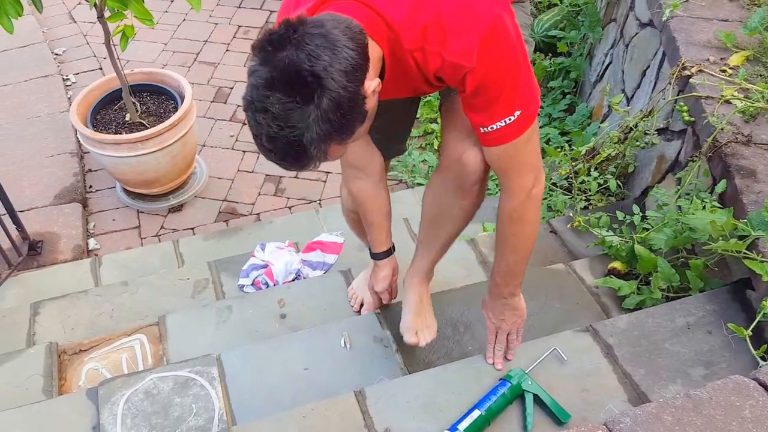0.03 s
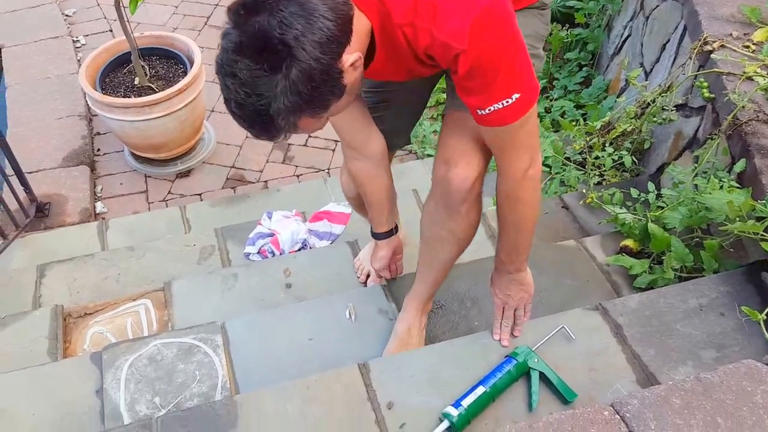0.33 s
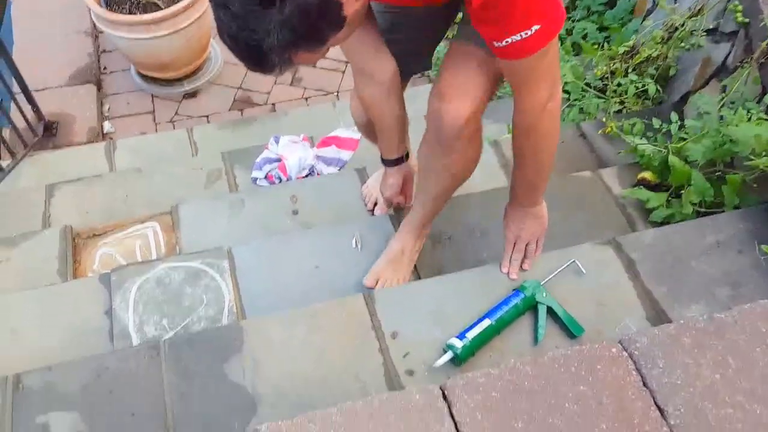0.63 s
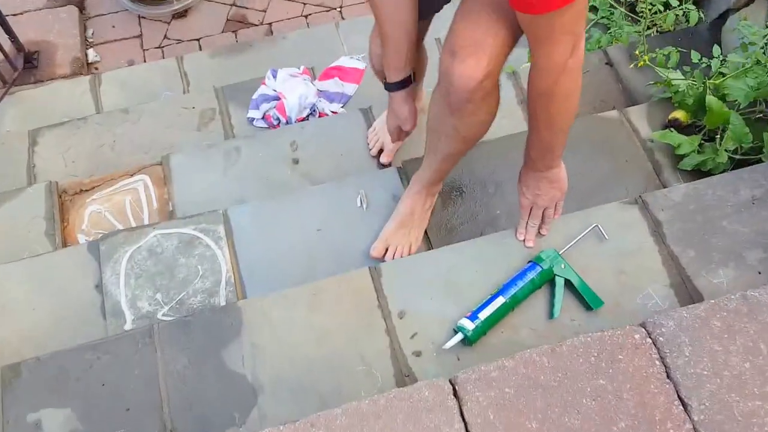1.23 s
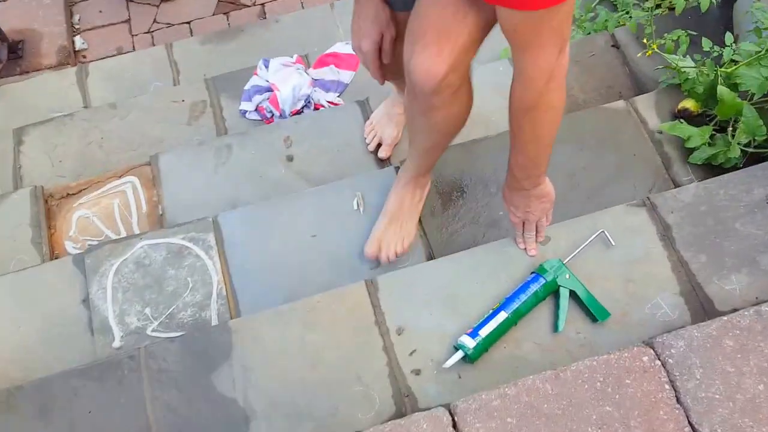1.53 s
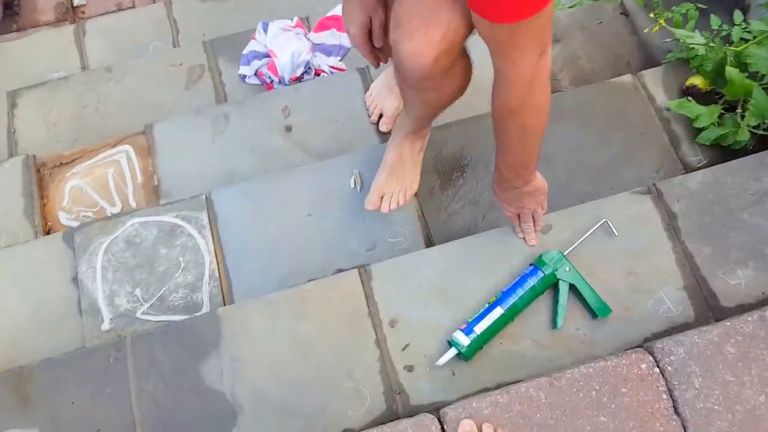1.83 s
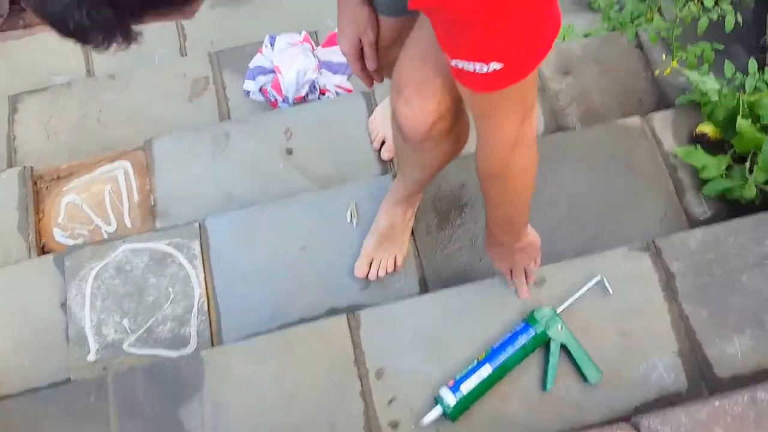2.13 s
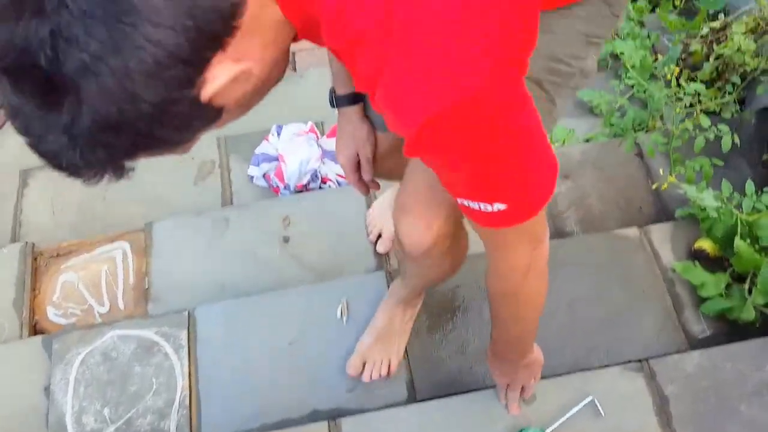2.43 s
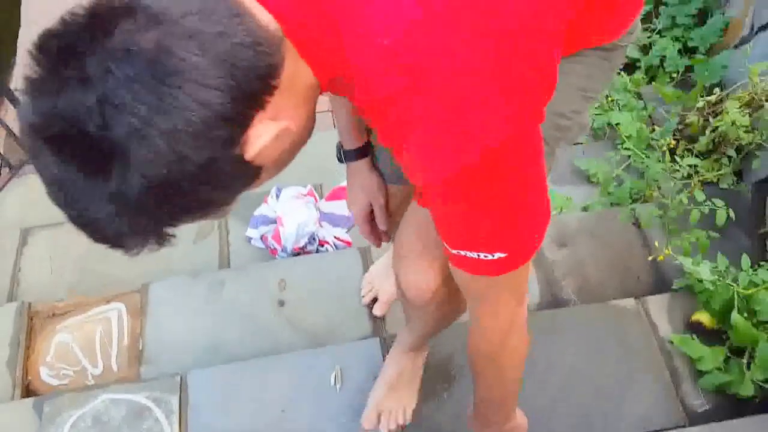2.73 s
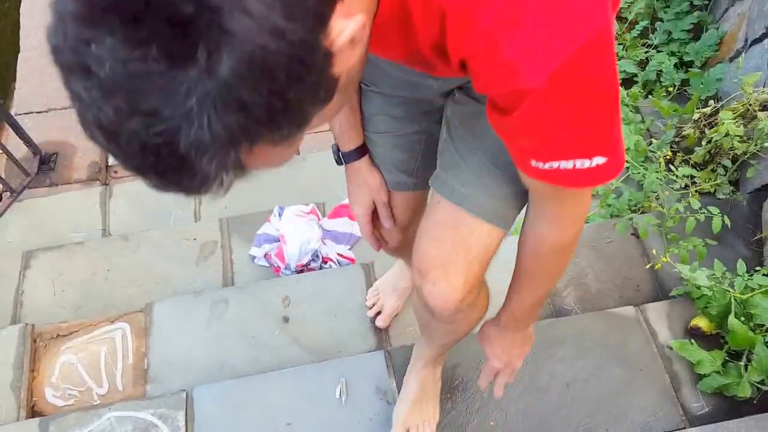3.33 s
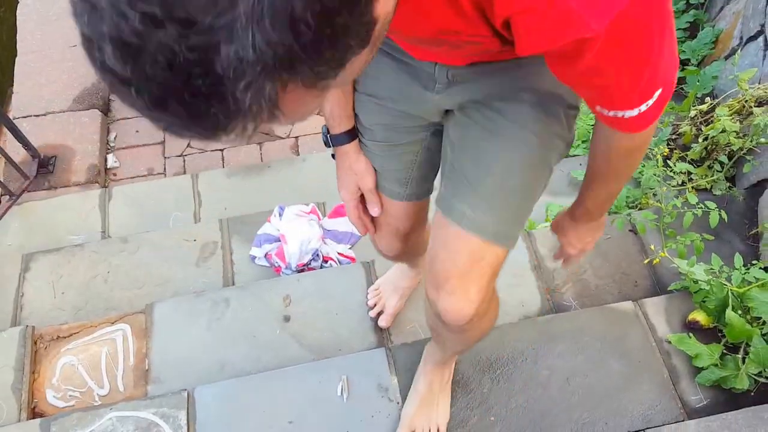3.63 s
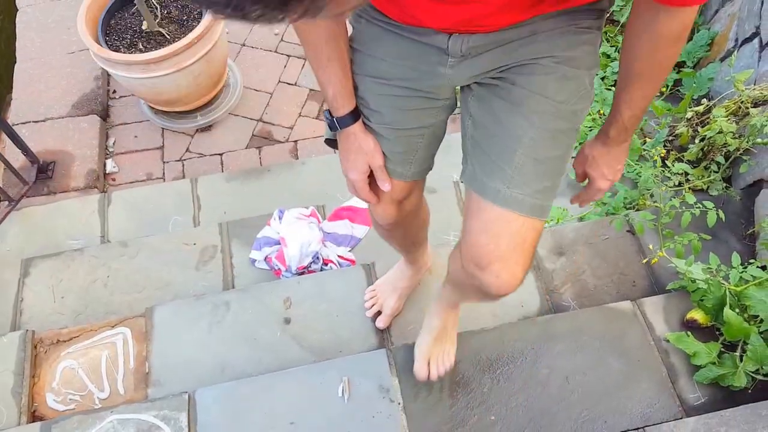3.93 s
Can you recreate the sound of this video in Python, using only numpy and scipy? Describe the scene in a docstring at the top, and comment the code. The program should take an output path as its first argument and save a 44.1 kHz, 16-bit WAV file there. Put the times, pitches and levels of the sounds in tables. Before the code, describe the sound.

Eight hollow stone knocks, soft at first and then harder, come from a nearby loose slab being rocked on outdoor steps. Each has a brief echo. Faint skin scuffs, cloth rustle and one thin, distant call sit underneath.

```python
"""On garden steps, a bare foot rocks a loose stone slab eight times, harder and harder.
Each knock is a double impact: an edge touches down on grit, and some 10 ms later the slab clacks
onto its bed, exciting its own modes and the hollow beneath it. Steps and walls reflect the sound
briefly. Clothes rustle and skin scuffs by friction, loose grains tick, and a far, thin call,
perhaps a bird, sounds over the outdoor hush."""
import sys
import numpy as np
from scipy import signal
from scipy.fft import rfft, irfft
from scipy.io import wavfile
from scipy.ndimage import uniform_filter1d

SR = 44100
rng = np.random.default_rng(int(sys.argv[2]) if len(sys.argv) > 2 else 0)


def int16_out(signal):
    """Quantize to a 16-bit WAV file."""
    q = np.round(np.clip(np.atleast_2d(signal).T, -1, 1) * 32767)
    wavfile.write(sys.argv[1], SR, q.astype(np.int16))


N = 176400
KNOCK_N = SR // 2   # samples in one knock with its echoes
TIME, HZ = np.arange(N) / SR, np.maximum(np.arange(N // 2 + 1) * SR / N, 1)
AGE, KNOCK_HZ = np.arange(KNOCK_N) / SR, np.maximum(np.arange(KNOCK_N // 2 + 1) * SR / KNOCK_N, 1)

# Spectrum of the hush. Each row: frequency in Hz, relative density in dB.
HUSH_SPECTRUM = [(15, -62), (25, -43.5), (38, -16), (102, -2), (130, -13), (166, -6), (242, -17.5),
                 (301, -12.5), (394, -21), (489, -15.5), (591, -25), (863, -23.5), (1610, -30), (2000, -27),
                 (4490, -41.5), (6050, -38), (6920, -46.5), (12500, -43.5), (16000, -48.5)]
# Likeness of the hush on the two sides. Each row: frequency in Hz, coherence from 0 to 1.
HUSH_COHERENCE = [(60, 1), (150, 0.93), (380, 0.89), (950, 0), (2380, 0.031), (5980, 0), (15000, -0.0)]
# Skin scuffing on stone. Each row: middle in seconds, half length in seconds, centre in Hz,
# width as a share of the centre, level in dB.
SKIN_SCUFFS = [(0.02, 0.054, 1750, 0.15, -61), (0.298, 0.0045, 2000, 0.15, -56),
               (0.324, .012, 2160, 0.17, -56), (0.44, 0.011, 4440, 0.14, -62),
               (1.756, 0.0022, 1590, 0.51, -53), (3.35, .09, 13000, 0.17, -67.5),
               (3.373, 0.082, 2340, 0.3, -64), (3.524, 0.0098, 2060, 0.12, -50.5)]
# Cloth and skin brushing. Each row: middle in seconds, half length in seconds, level in dB.
CLOTH_BRUSHES = [(0.301, 0.0072, -53), (0.339, 0.013, -54.5), (0.863, .003, -61), (1.364, .045, -57),
                 (2.225, .003, -57.5), (2.771, 0.01, -58), (3.375, 0.11, -62.5), (3.365, 0.0056, -56),
                 (3.519, 0.017, -49), (3.604, 0.093, -60.5), (3.951, 0.0055, -59.5)]
# Spectrum of rubbing cloth. Each row: frequency in Hz, relative density in dB.
CLOTH_SPECTRUM = [(500, -8), (1300, -2), (2200, 5.5), (3200, 2.5), (5000, -3.5), (7000, -10), (11000, -4),
                  (14000, -6), (16000, -21)]
# The slab's knocks. Each row: touch of the edge in seconds, landing in seconds; grit, crunch, clack,
# chip and stone ring, each in dB; hollow pitch in Hz, hollow at touch in dB, hollow at landing in dB;
# thud in Hz, thud in dB, bass in dB, rattle in Hz, rattle in dB, echo gain in dB.
SLAB_KNOCKS = [ (0.3368, 0.3439, -53, -39.5, -37, -52.5, -39.5, 397.5, -21, -17.5, 270, -24, -34.5, 870, -43, -8),
               (0.6717, 0.683, -38.5, -35.5, -25.5, -49.5, -45, 392, -27, -15.5, 259, -19.5, -28.5, 2130, -39, -2.5),
               (1.0639, 1.0744, -34, -27.5, -23, -38.5, -31.5, 365, -15.5, -12, 214.5, -17.5, -23, 680, -36.5, 0.5),
               (1.6312, 1.6418, -34.5, -25.5, -22.5, -21.5, -34, 360, -17, -14, 214, -19, -23.5, 500, -25.5, -2),
               (1.9949, 2.0035, -36, -22, -9.5, -21.5, -21, 373, -12, -5.5, 185, -13.5, -31, 1610, -31.5, -2),
               (2.4428, 2.4504, -35, -14.5, -12.5, -22.5, -14.5, 372, -12.5, -18, 209, -13, -14.5, 1250, -27, -1.5),
               (3.033, 3.041, -28.5, -28.5, -8.5, -23, -25, 367, -15.5, -6, 217, -6.5, -14.5, 966, -26.5, -1.5),
               (3.6795, 3.6861, -26.5, -18.5, -25, -24.5, -21, 304, -9, -11.5, 223, -1, -44, 736, -17.5, 2.5)]
# Spectra of crushed grit and of stone on stone. Each row: frequency in Hz, relative density in dB.
GRIT_SPECTRUM = [(800, -15), (2500, -1), (4500, -1.5), (7000, -10), (9000, -8.5), (10800, -2.5),
                 (13000, -4), (16000, -10.5)]
STONE_SPECTRUM = [(300, 13.5), (700, 2), (1100, 1), (1900, 1), (2700, -4.5), (4000, -12), (5500, -38),
                  (8000, -32), (16000, -38.5)]
# The slab's modes. Each row: frequency in Hz, relative level in dB, time to fall 60 dB in seconds.
SLAB_MODES = [(334, 2.5, .06), (453.3, 3, 0.079), (495.3, -0.5, 0.099), (626, -4, 0.086), (712, -23, 0.026),
              (980, -0.5, 0.018), (1296, -7.5, 0.062), (1703, 0, 0.012), (2680, -23, 0.016),
              (3880, -48, 0.0092)]
# Balance of the direct sound. Each row: frequency in Hz, left minus right in dB.
DIRECT_BALANCE = [(300, -0.5), (1000, 2.7), (2000, 3.7), (4000, -5), (8000, 2), (13000, 1)]
# Phase of the direct sound. Each row: frequency in Hz, lead of the left side in radians.
DIRECT_PHASE = [(60, .05), (250, 0.1), (500, 0.23), (1000, 0.54), (2000, 1.04), (4000, 1.1), (8000, 1.47),
                (14000, 1.75)]
# Echo of steps and walls. Each row: band in Hz, relative level in dB, time to fall 60 dB in seconds.
ECHO_BANDS = [(80, -10.5, 0.38), (178, -10, 0.26), (383, -10.5, 0.28), (810, -4, 0.26), (1470, -11, 0.31),
              (3060, -12.5, 0.33), (6100, -9, 0.22), (12000, -12.5, 0.23)]
# Course of the far call. Each row: time in seconds, fundamental in Hz, level in dB.
CALL_CONTOUR = [(0.89, 782, -88), (0.94, 790, -58), (1.031, 785, -55), (1.14, 770, -53.5),
                (1.21, 800, -65.5), (1.34, 766, -77)]
# Timbre of the call. Each row: harmonic number, relative level in dB.
CALL_HARMONICS = [(2, -11), (3, -1.5), (4, -0.5), (5, -14), (6, -7), (7, -20)]

ATTACK_S = 0.00071   # rise of a hard contact


def from_db(db):
    """Amplitude grows tenfold with every 20 dB."""
    return 10 ** (np.asarray(db) / 20)


def rms_one(x):
    """Normalisation to unit mean power."""
    return x / np.sqrt(np.mean(x ** 2) + 1e-20)


def at_hz(points, hz):
    """Interpolation of a two-column table along log frequency."""
    points = np.array(points)
    return np.interp(np.log(hz), np.log(points[:, 0]), points[:, 1])


def resonance(hz, centre_hz, width):
    """Band-pass gain with steep skirts; the width is a share of the centre frequency."""
    return 1 / (1 + ((hz / centre_hz - centre_hz / hz) / (2 * width)) ** 2)


def swell(middle_s, half_s):
    """A Gaussian envelope: a smooth rise and fall about one moment."""
    return np.exp(-.5 * np.minimum(((TIME - middle_s) / half_s) ** 2, 100))


def outdoor_hush(level_db=-50.5):
    """Partial coherence: steady noise, alike on both sides in the bass, independent in the treble."""
    mid, side = rfft(rng.standard_normal((2, N)))
    coherence = np.clip(at_hz(HUSH_COHERENCE, HZ), 0, 1)
    field = np.sqrt(1 + coherence) * mid + np.sqrt(1 - coherence) * side * [[1], [-1]]
    return from_db(level_db) * rms_one(irfft(from_db(at_hz(HUSH_SPECTRUM, HZ)) * field, N))


def friction(colour, spread_db=3.5):
    """Friction noise is a dense run of uneven micro-clicks; colour is its gain at each frequency."""
    size = 2 * (len(colour) - 1)
    grain_db = spread_db * np.clip(rng.standard_normal(size // 16 + 1), -2, 2)
    clicks = rng.standard_normal(size) * from_db(np.repeat(grain_db, 16)[:size])
    return rms_one(irfft(rfft(clicks) * colour))


def rustle():
    """Sliding friction as the weight shifts: skin scuffs in narrow bands, cloth in a broad one."""
    scuffs = sum(from_db(db) * swell(middle_s, half_s) * friction(resonance(HZ, hz, width))
                 for middle_s, half_s, hz, width, db in SKIN_SCUFFS)
    brushing = sum(from_db(db) * swell(middle_s, half_s) for middle_s, half_s, db in CLOTH_BRUSHES)
    cloth = np.array([friction(from_db(at_hz(CLOTH_SPECTRUM, HZ))) for _ in range(2)])
    return scuffs + brushing * cloth


def impact(colour, start_s, decay_s, rise_s=ATTACK_S, uneven=0.63):
    """Rough surfaces meet in a run of micro-contacts that rises, then decays exponentially."""
    t = AGE - start_s
    envelope = np.clip(t / rise_s, 0, 1) * np.exp(-np.clip((t - rise_s) / decay_s, 0, 20))
    spectrum = rfft(envelope * friction(np.ones(len(colour)), spread_db=6.5))
    spectrum *= (np.abs(spectrum) + 1e-9) ** (uneven - 1)   # uneven 0: a clean crack, 1: a ragged run
    contacts = irfft(colour * spectrum) * envelope ** 0.25
    return rms_one(contacts) * np.sqrt(np.mean(envelope ** 2))


def boom(start_s, hz, swell_s):
    """A heavily damped resonance swells to an envelope of 1 and dies within a few cycles."""
    t = np.maximum(AGE - start_s, 0)
    return (t / swell_s) ** 2 * np.exp(2 - 2 * t / swell_s) * np.sin(2 * np.pi * hz * t)


def stone_ring(start_s, scatter_db=1.5):
    """Free vibration: one contact excites every mode of the slab, each with a strength of its own."""
    t = np.maximum(AGE - start_s, 0)
    scatter = scatter_db * rng.standard_normal(len(SLAB_MODES))
    return sum((-1) ** k * from_db(db + scatter[k] - 60 * t / t60) * np.sin(2 * np.pi * hz * t)
               for k, (hz, db, t60) in enumerate(SLAB_MODES))


def rocking_slab(low_cut_hz=79):
    """Impact excitation, twice a knock: the edge crunches on grit, then the slab lands and rings."""
    direct, echoes = np.zeros(N + KNOCK_N), np.zeros((2, N + KNOCK_N))
    stone, grit = from_db(at_hz(STONE_SPECTRUM, KNOCK_HZ)), from_db(at_hz(GRIT_SPECTRUM, KNOCK_HZ))
    for (touch_s, land_s, grit_db, crunch_db, clack_db, chip_db, ring_db, hollow_hz, touch_db, land_db,
         thud_hz, thud_db, bass_db, rattle_hz, rattle_db, echo_db) in SLAB_KNOCKS:
        settle_s = land_s - touch_s
        rattle = resonance(KNOCK_HZ, rattle_hz, width=0.099)
        touch = (from_db(grit_db) * impact(grit, 0, decay_s=0.0037)
                 + from_db(crunch_db) * impact(stone, 0, decay_s=0.0078, rise_s=settle_s)
                 + from_db(touch_db) * boom(start_s=0.001885, hz=hollow_hz, swell_s=0.0045)
                 + from_db(bass_db) * boom(start_s=0.001885, hz=113.6, swell_s=0.0084))
        landing = (from_db(clack_db) * impact(stone, settle_s, decay_s=0.002)
                   + from_db(chip_db) * impact(grit, settle_s, decay_s=0.0039)
                   + from_db(rattle_db) * impact(rattle, settle_s, decay_s=0.013)
                   + from_db(ring_db) * stone_ring(settle_s)
                   + from_db(land_db) * boom(settle_s + 0.00294, hollow_hz, swell_s=0.0049)
                   + from_db(thud_db) * boom(settle_s, thud_hz, swell_s=0.0034))
        knock = touch + landing
        span = slice(int(touch_s * SR), int(touch_s * SR) + KNOCK_N)
        direct[span] += knock
        echoes[:, span] += from_db(echo_db) * (scattered_echoes(knock) + wall_slap(knock))
    low_cut = signal.butter(2, low_cut_hz, "high", fs=SR, output="sos")
    return signal.sosfilt(low_cut, from_below(direct[:N]) + echoes[:, :N])


def from_below(x):
    """Direction cues: the direct sound reaches left and right with a different level and phase."""
    left = from_db(at_hz(DIRECT_BALANCE, HZ) / 2) * np.exp(.5j * at_hz(DIRECT_PHASE, HZ))
    return irfft(rfft(x) * np.array([left, 1 / left]), N)


def scattered_echoes(knock, delay_s=0.0013, build_s=0.0018, wide_above_hz=640):
    """Diffuse reflection off steps and walls decays band by band and is wider in the treble."""
    t = np.maximum(AGE - delay_s, 0)
    width = KNOCK_HZ / (KNOCK_HZ + wide_above_hz)
    mid, side = rfft(rng.standard_normal((2, KNOCK_N)))
    field = (mid + side * width * [[1], [-1]]) / np.sqrt(1 + width ** 2)
    log_centres = np.log([row[0] for row in ECHO_BANDS])
    response = 0
    for share, (_, db, t60) in zip(np.eye(len(ECHO_BANDS)), ECHO_BANDS):
        envelope = (1 - np.exp(-t / build_s)) * from_db(-60 * t / t60)
        band = irfft(field * np.interp(np.log(KNOCK_HZ), log_centres, share))
        response += from_db(db) * band * envelope / np.sqrt(np.sum(envelope ** 2))
    return signal.fftconvolve(knock[None], response, axes=1)[:, :KNOCK_N]


def wall_slap(knock, delay_s=0.016, gain_db=-16.5, cutoff_hz=1500):
    """Specular reflection: the nearest wall returns one delayed, dull copy."""
    delayed = rfft(knock) * np.exp(-2j * np.pi * KNOCK_HZ * delay_s)
    return from_db(gain_db) * irfft(delayed / (1 + 1j * KNOCK_HZ / cutoff_hz))


def loose_grit(calm_per_s=8.1, stirred_per_s=140, settle_s=0.045):
    """A Poisson process: stray grains tick underfoot, more often and louder after a hard landing."""
    land_s, clack_db = np.array(SLAB_KNOCKS)[:, [1, 4]].T
    stirred = sum(from_db(db - clack_db.max()) * (TIME > s) * np.exp(-np.clip((TIME - s) / settle_s, 0, 20))
                  for s, db in zip(land_s, clack_db))
    ticking = rng.random(N) < (calm_per_s + stirred_per_s * stirred) / SR
    tick_db = -59 + 16 * np.sqrt(stirred) + 4 * np.clip(rng.standard_normal(N), -2, 2)
    tick = impact(from_db(at_hz(GRIT_SPECTRUM, KNOCK_HZ)), 0, decay_s=ATTACK_S)
    return from_below(signal.fftconvolve(ticking * from_db(tick_db), tick)[:N])


def far_call(waver=0.012, fade_db=2, chirp_hz=2145, chirp_db=-57):
    """A harmonic series on a sagging pitch, each partial fading in and out; a brief second note joins."""
    times, hz, db = np.transpose(CALL_CONTOUR)
    wobble = rms_one(uniform_filter1d(rng.standard_normal(N), size=50))
    pitch_hz = np.interp(TIME, times, hz) * (1 + waver * wobble)
    phase = 2 * np.pi * np.cumsum(pitch_hz) / SR
    note = 0
    for harmonic, level_db in CALL_HARMONICS:
        fading = rms_one(uniform_filter1d(uniform_filter1d(rng.standard_normal(N), size=900), size=500))
        note += from_db(level_db + fade_db * fading) * np.sin(harmonic * phase)
    chirp = from_db(chirp_db) * swell(middle_s=1.02, half_s=0.031) * np.sin(2 * np.pi * chirp_hz * TIME)
    return np.interp(TIME, times, from_db(db), left=0, right=0) * note + chirp


def scene():
    """Superposition: the pressures of slab, rustle, call, hush and grit add."""
    return rocking_slab() + rustle() + far_call() + outdoor_hush() + loose_grit()


def record(dry, stopband_hz=16700):
    """Soft saturation rounds the highest peaks, and a steep low-pass filter cuts the top."""
    rounded = dry / (1 + dry ** 8) ** (1 / 8)
    return signal.sosfilt(signal.cheby2(16, 70, stopband_hz, fs=SR, output="sos"), rounded)


dry = scene()
out = record(dry)
int16_out(out)
```